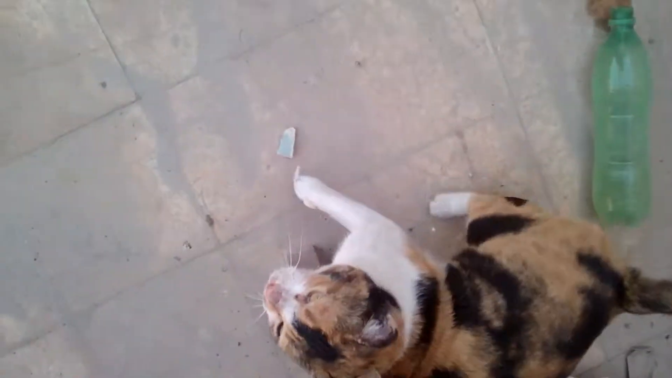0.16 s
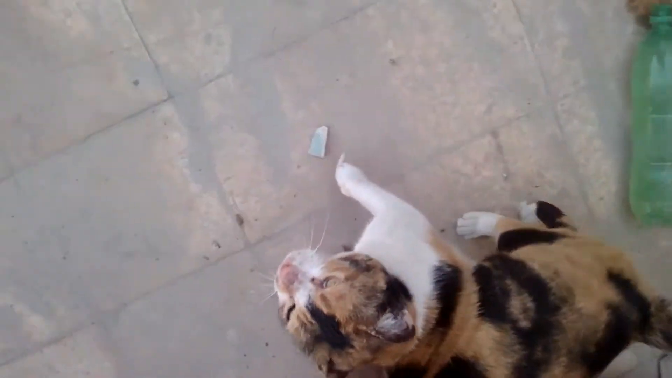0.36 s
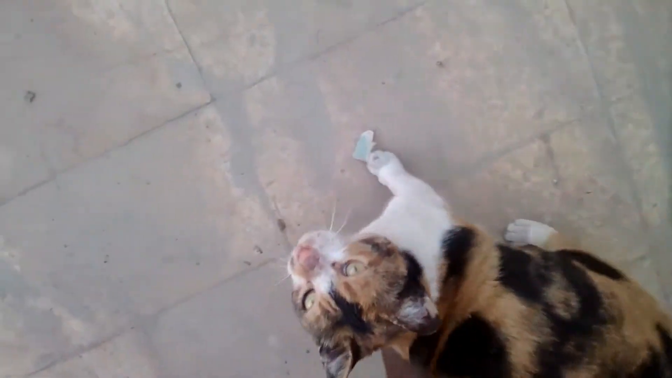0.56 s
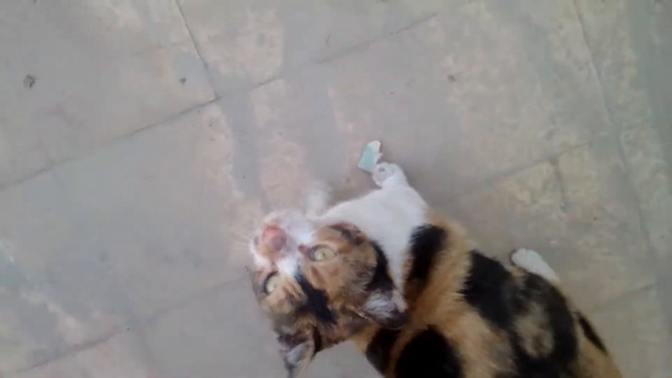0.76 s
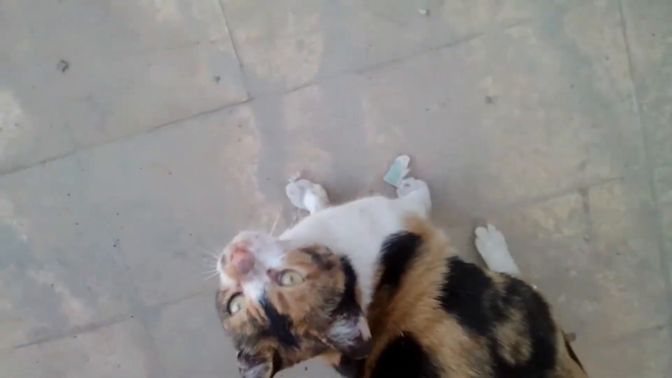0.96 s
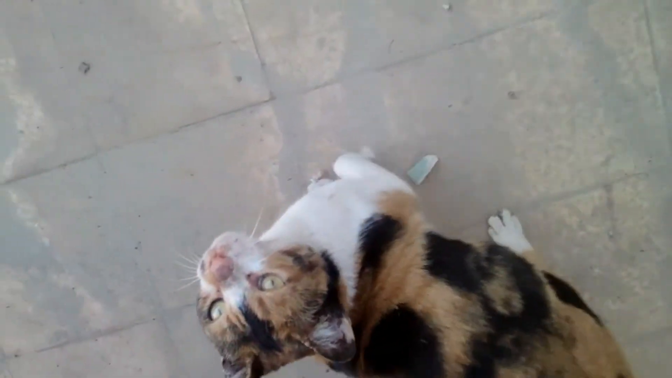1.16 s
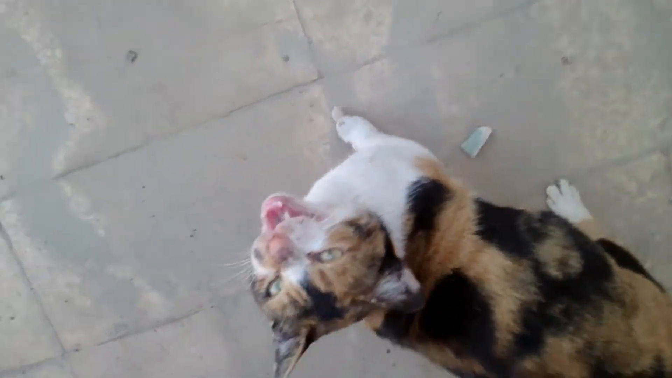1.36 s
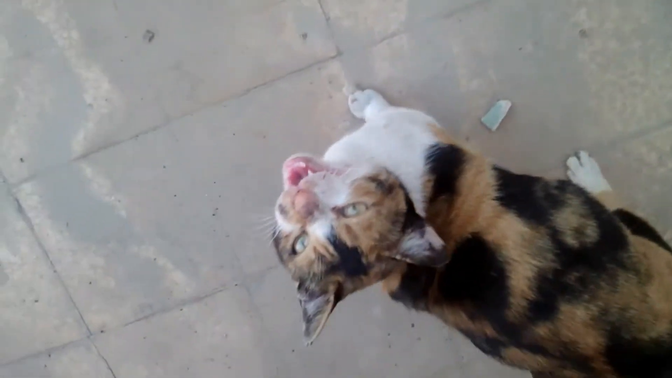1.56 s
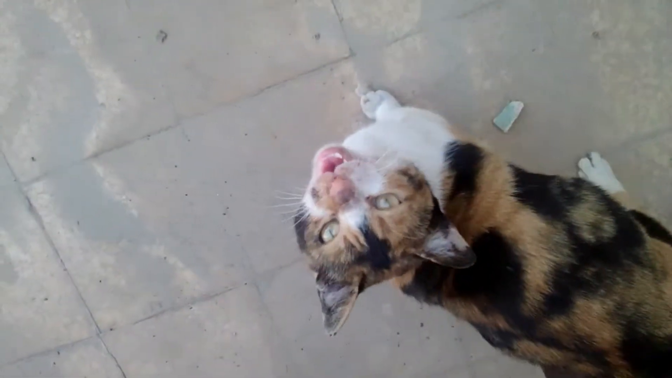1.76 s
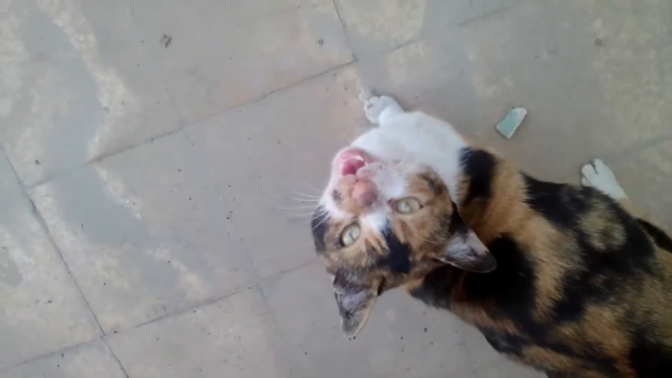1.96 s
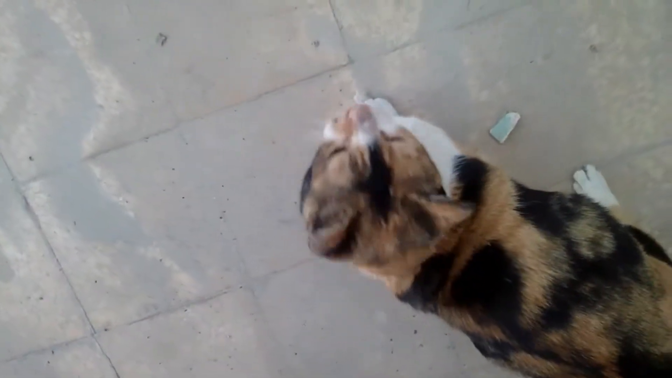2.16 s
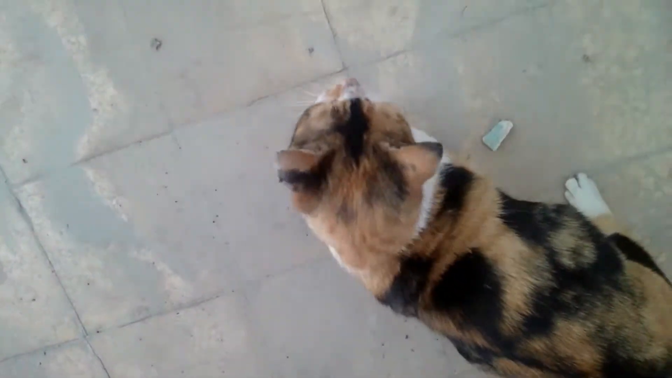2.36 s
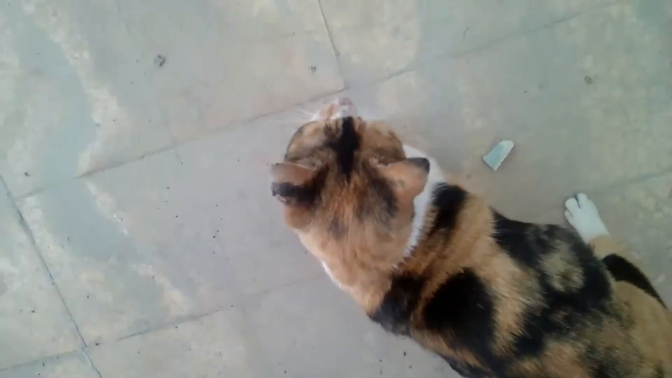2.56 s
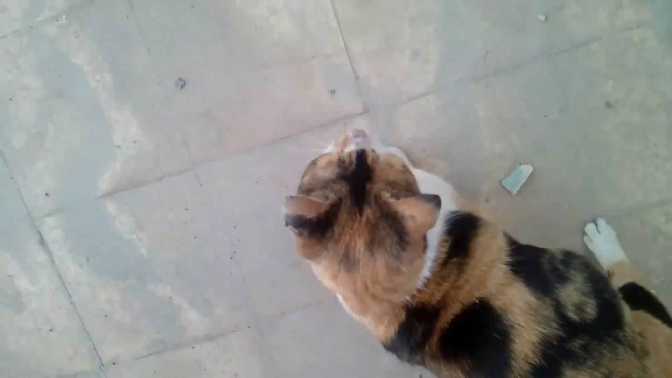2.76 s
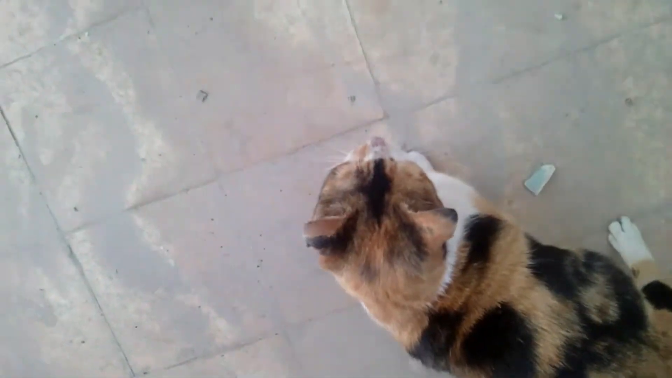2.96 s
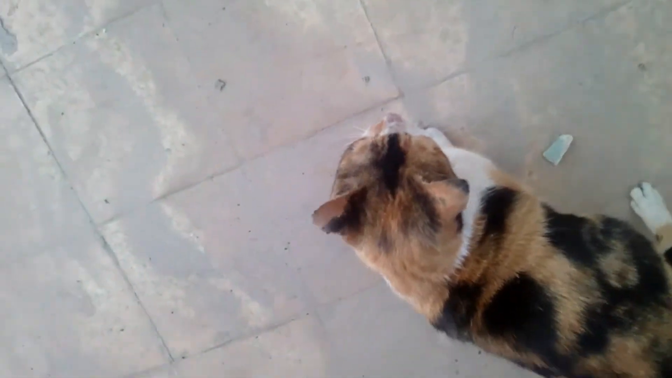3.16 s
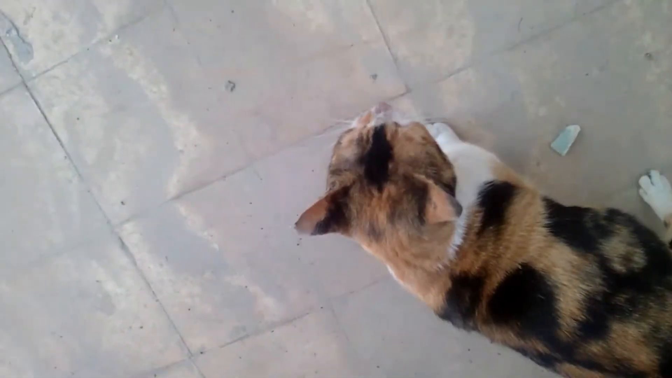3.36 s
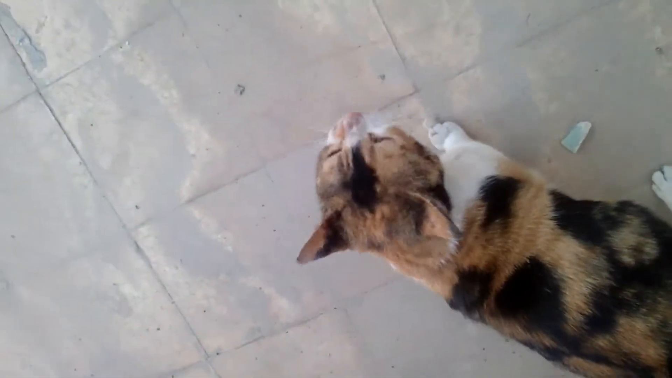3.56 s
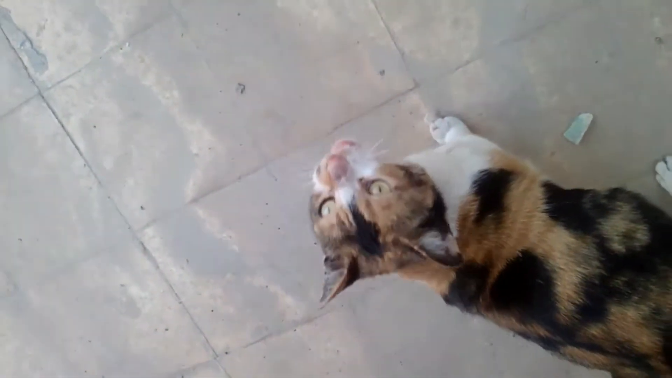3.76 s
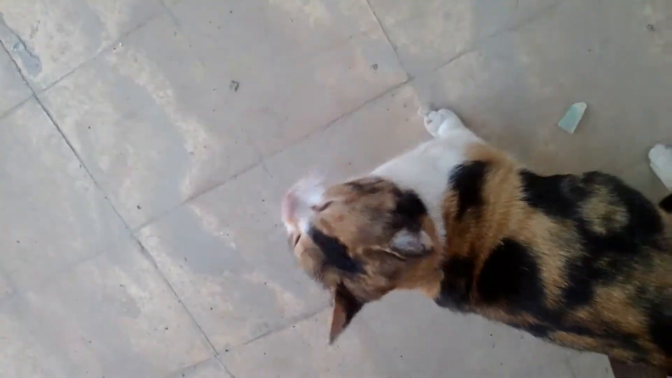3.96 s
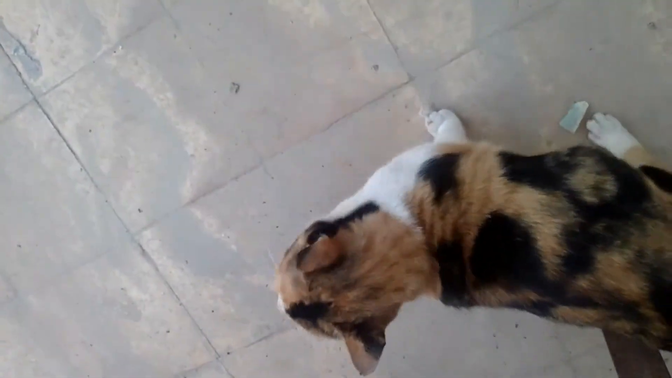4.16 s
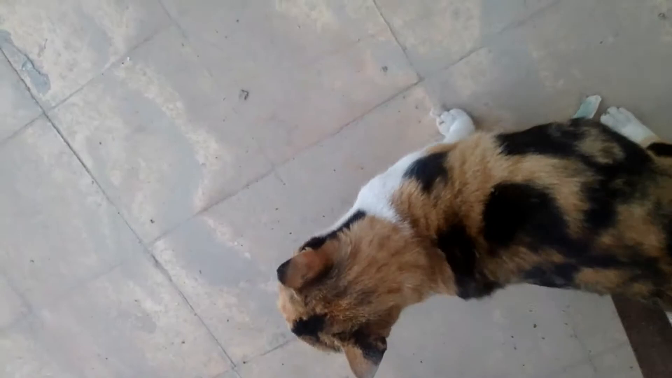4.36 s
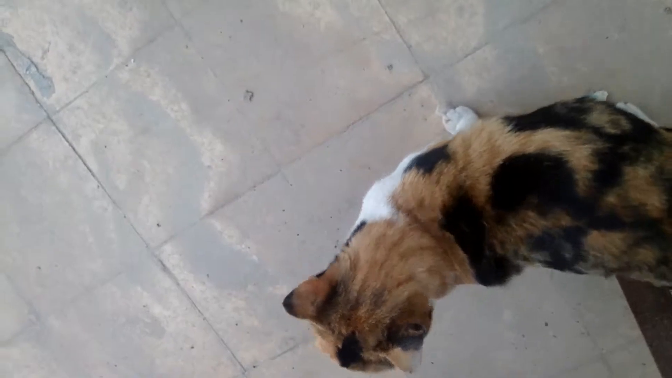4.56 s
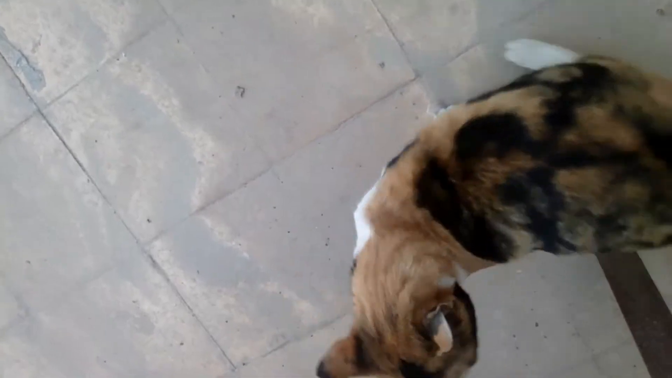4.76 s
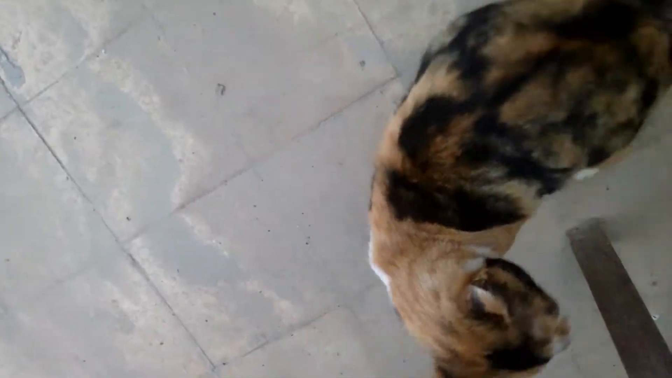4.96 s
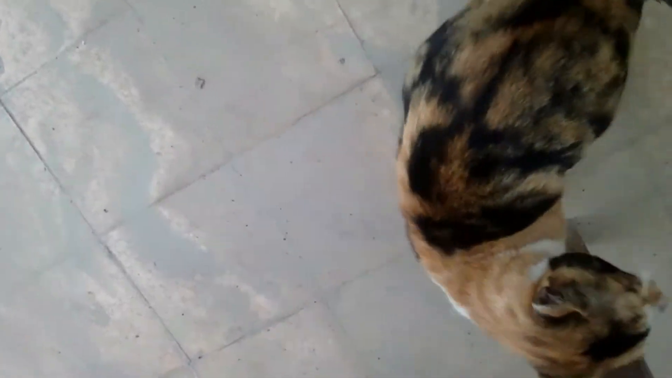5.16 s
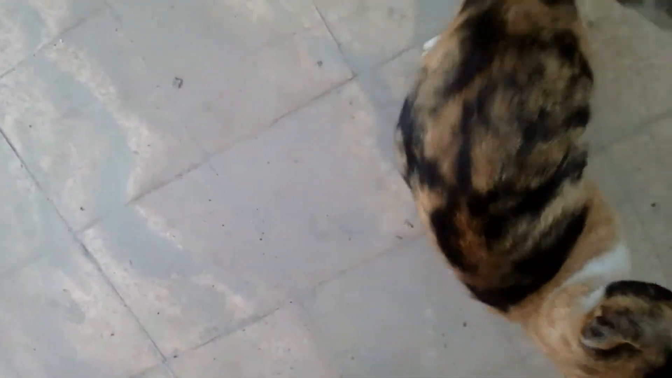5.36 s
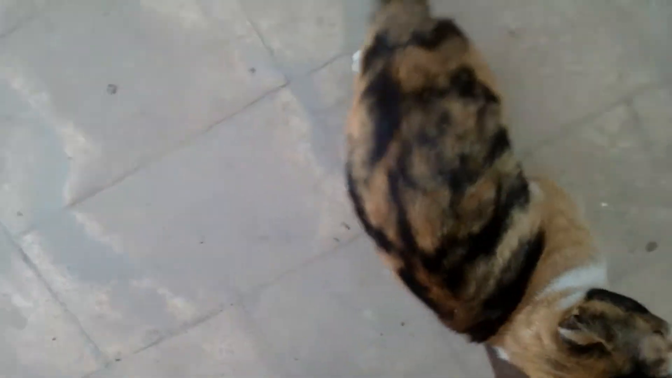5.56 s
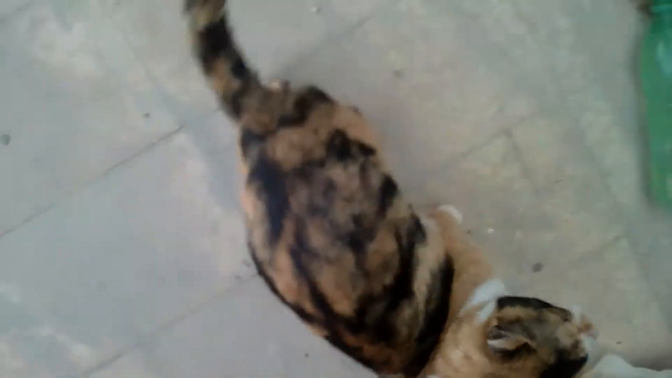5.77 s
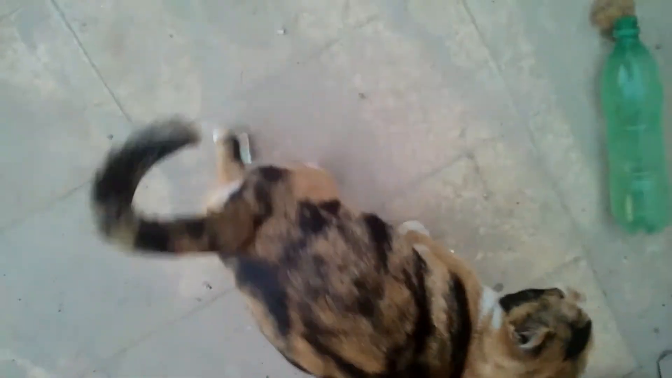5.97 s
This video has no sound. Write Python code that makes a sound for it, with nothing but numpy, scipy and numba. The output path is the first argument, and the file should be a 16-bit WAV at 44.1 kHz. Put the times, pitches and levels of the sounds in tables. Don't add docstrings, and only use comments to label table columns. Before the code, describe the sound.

A cat close to a phone microphone in a hard-floored space purrs twice very briefly, then gives a long, loud, nasal meow ending in a creak. Sharp lip smacks follow, then a shorter meow and finally a soft, brief one. Behind lie low town rumble, faint blurred birds and hiss, with momentary dropouts.

```python
import sys
import numpy as np
from scipy import signal
from scipy.io import wavfile
from scipy.ndimage import uniform_filter1d
from numba import njit

SR = 44100
rng = np.random.default_rng(int(sys.argv[2]) if len(sys.argv) > 2 else 0)


def level_to_linear(level):
    exponent = np.asarray(level, float) / 20
    return 10 ** exponent


def master(y):
    cut = np.clip(np.atleast_2d(y).T, -1, 1)
    pcm = np.round(cut * 32767)
    wavfile.write(sys.argv[1], SR, pcm.astype(np.int16))


N = 264600
T = np.arange(N) / SR

# start [s], creak start [s], end [s], creak effort [dB], mouth resonance in the creak [Hz].
CALLS = [
    (1.436, 2.368, 2.525, -41, 1850),
    (3.43, 4.098, 4.18, -42, 1550),
    (4.93, 5.338, 5.42, -50, 1420),
]
# time [s], pitch [Hz], effort [dB], jaw open [0-1], tongue forward [0-1], lips rounded [0-1].
SUNG_1 = [(1.457, 522.7, -41.5, 0.79, 0.99, 0), (1.487, 567.6, -33, .72, 0.7, 0.49),
          (1.535, 577.7, -32, 0.62, 0.74, 0.33), (1.575, 559.3, -37.5, 0.93, 0.79, .47),
          (1.671, 545.8, -33, 0.91, 0.54, 0.68), (1.921, 525.9, -37, 1, 0.57, 0.59),
          (2.171, 547, -35, 1, 0.03, 0.67), (2.25, 544.6, -35.5, 1, 0.55, 0.63),
          (2.309, 534, -45, 0.99, 0.73, 0.38)]
SUNG_2 = [(3.467, 488, -48.5, 0.79, 0.65, 0.72), (3.5, 542, -41.5, 0.75, 0.67, 0.52),
          (3.524, 516.6, -42.5, .78, .68, 0.53), (3.64, 558, -37, 0.73, 0.7, 0.64),
          (3.674, 569.6, -39, 0.48, 0.67, 0.54), (3.73, 563, -37.5, 0.09, .08, .74),
          (3.86, 549.2, -35, 0.86, 0.11, 0.63), (4.032, 529.7, -40.5, 1, 0.29, 0.68),
          (4.07, 512, -47.5, 1, 0.7, 0.54)]
SUNG_3 = [(4.97, 446, -59.5, 0.62, 0.37, 0.75), (5.02, 476.4, -47, 0.74, 0.68, 0.42),
          (5.05, 523, -46, 0.79, 0.93, 0.27), (5.08, 543.6, -48, 0.76, 0.86, 0.65),
          (5.115, 555, -46, 0.92, 0.92, 0.48), (5.171, 557, -42, 0.78, 0.38, 0.59),
          (5.225, 543.4, -48, 0.96, 0.76, 1.03), (5.279, 541.6, -44, 0.89, 0.26, 0.79),
          (5.319, 537, -52, 0.92, 0.79, 0.63)]
# from [s], to [s], fade [s], weakening of every second pulse [0-1],
# roughness [0-1].
DOUBLING = [
    (1.436, 1.445, .02, .15, .2),
    (1.478, 1.538, .025, .8, .035),
    (1.54, 1.555, .04, .3, .08),
    (2.275, 2.3, .02, .35, .06),
    (3.44, 3.6, .02, .6, .14),
    (3.605, 3.645, .08, .8, .06),
    (3.94, 4.09, .02, .06, .045),
    (4.93, 5.0, .03, .2, .2),
    (5.03, 5.22, .03, .04, .025),
]
# middle [s], half length [s], peak level [dB].
PURRS = [
    (1.03, 0.08, -52),
    (1.23, .11, -46),
]
# start [s], peak level [dB], colour [Hz], ring [s].
SMACKS = [(2.839, -34.5, 4530, 0.013), (2.843, -29.5, 5550, 0.017), (2.846, -39, 1300, 0.022),
          (2.85, -33.5, 4790, 0.1), (2.8567, -22, 4100, 0.0072), (2.865, -39.5, 5060, 0.03),
          (2.869, -35, 5030, 0.068), (3.1748, -28, 4940, 0.022), (3.1843, -36.5, 4960, 0.12),
          (3.2186, -38.5, 5200, 0.024), (3.229, -40.5, 4700, .02), (1.437, -40, 3800, .03),
          (3.44, -45, 1550, .02), (4.118, -37.5, 4797, 0.018), (4.123, -36, 3291, 0.045),
          (4.9158, -45, 4030, 0.0082), (5.749, -59, 845, .04)]
# centre [Hz], width [Hz], level [dB].
SMACK_MODES = [(1300, 300, 2), (2800, 130, -5), (4100, 670, -5), (5200, 1100, -14.5), (6400, 1200, -30),
               (8000, 5400, -15.5)]
# start [s], length [s], centre [Hz], spread [Hz], level [dB].
CHIRPS = [(3.662, 0.1, 8630, 900, -65.5), (0.761, 0.055, 5000, 900, -65.5), (0.869, 0.032, 5430, 700, -61),
          (.87, 0.023, 2730, 340, -64.5), (0.864, 0.021, 3800, 1620, -62), (1.34, 0.024, 5670, 370, -63),
          (4.196, 0.047, 5200, 970, -60.5), (4.284, 0.063, 4270, 973, -58.5),
          (5.468, 0.049, 2800, 111, -71), (5.607, 0.089, 2070, 200, -64), (5.689, 0.088, 2605, 216, -60.5),
          (5.766, 0.19, 2710, 216, -64), (5.798, 0.043, 4930, 750, -56), (5.886, 0.036, 5200, 833, -66),
          (5.924, 0.038, 3170, 324, -59), (5.925, 0.023, 4760, 1300, -54), (-.05, 0.14, 3080, 540, -62),
          (-.05, 0.19, 3850, 450, -66)]
# start [s], length [s], centre [Hz], spread [Hz], level [dB].
TWITTER = [
    (-.05, 0.11, 4640, 1296, -59),
    (0.101, 0.45, 4800, 1389, -71.5),
    (1.319, 0.12, 4600, 1500, -62.5),
    (2.644, 0.24, 4660, 1843, -64),
    (2.972, 0.34, 4240, 2040, -71),
    (4.407, 0.22, 4500, 826.8, -67.5),
]
# start [s], length [s], pitch [Hz], level [dB].
SQUEALS = [
    (.452, .15, 3660, -68.5),
    (.635, .165, 3655, -67.5),
    (.47, .335, 3321, -71.5),
]
# pitch [Hz], level [dB].
HUMS = [(1848, -80), (1583, -84.5), (11060, -89), (150.2, -76.5)]
# frequency [Hz], level [dB per Hz].
AIR_SPECTRUM = [(15, -53), (25, -35), (93, -3.5), (178, -6), (215, 0.5), (260, -2), (297, -10.5), (410, -7),
                (997, -9.5), (1200, -12.5), (1850, -13), (2490, -14.5), (3630, -13.5), (3930, -9.5),
                (15500, -31.5)]
# middle [s], half length [s], level over the rumble [dB].
SWELLS = [
    (2.1, 0.49, 2.5),
    (2.473, 0.14, 9.5),
    (3.05, .25, 5),
    (3.945, 0.35, 2.5),
    (4.732, .08, 0.5),
    (5.128, 0.15, 2.5),
    (5.338, 0.032, 5.5),
    (5.9, 0.055, 2),
]
# shut [s], reopen [s].
MUTES = [
    (.293, .356),
    (4.793, 4.856),
    (5.537, 5.6),
    (5.985, 6.1),
]


def meows():
    hz, effort_db, jaw, tongue, round_lips = gestures()
    on = sum((T > c[0]) * np.clip((c[2] - T) / .03, 0, 1) for c in CALLS) * 1.
    on = uniform_filter1d(on, int(0.0022 * SR))
    creaks = [ramp(c[1] - .01, .02) * (T < c[2]) for c in CALLS]
    creak = sum(creaks)
    narrow = sum((T > c[0] - .1) * (1 - ramp(c[0] + .2, .05)) for c in CALLS)

    throat_db = effort_db - 35.5 + 32.5 * jaw
    mouth_db = effort_db - 28 + 35.5 * round_lips
    palate_db = effort_db - 36.5 + 40.5 * tongue
    nose_db = effort_db - 5.5 * round_lips

    spells = np.array([ramp(a - .01, .012) * (1 - ramp(b, fade_s)) for a, b, fade_s, _, _ in DOUBLING])
    doubled, coarse = ((spells * np.array(DOUBLING)[:, [c]]).max(axis=0) for c in (3, 4))
    rough = .013 * level_to_linear(-38 - nose_db)
    rough = np.minimum(rough + (coarse + .28 * creak) * level_to_linear(3 * walk(60)), .55)
    weak = doubled + .55 * creak

    lift = np.maximum(narrow, np.clip((nose_db + 42.5) / 4.5, 0, 1))
    throat_hz = 1120 - 252 * np.sqrt(doubled) - 90 * creak
    mouth_hz = 1666 + sum(k * (c[4] - 1666) for k, c in zip(creaks, CALLS))
    palate_hz = 2175 - 150 * creak
    nose_hz = 3180 + 530 * lift
    high_nose_hz = (4780 - 330 * lift) * (1 + .025 * walk(14))
    patchy_db = 2.0 * np.array([walk(14), walk(14)])
    high_nose_db = -3 + 4 * narrow + patchy_db[0]
    top_db = -10 + narrow - 4 * creak + patchy_db[1]
    path_ms = 0.898 + 0.11 * walk(7)

    lip_lowpass = signal.butter(8, 7500, fs=SR, output="sos")
    pulses = signal.sosfiltfilt(lip_lowpass, folds(hz, rough, weak))

    def ring(centre_hz, width_hz):
        return band(band(pulses, centre_hz, width_hz), centre_hz, width_hz)

    nose = ring(nose_hz, 1600) + level_to_linear(high_nose_db) * ring(high_nose_hz, 830)
    nose = nose + level_to_linear(top_db) * (ring(5210, 1299) + level_to_linear(-2) * ring(7040, 1000))
    nose = signal.sosfiltfilt(signal.butter(5, 2600, "high", fs=SR, output="sos"), nose)
    bounce = .33 * np.interp(T - path_ms / 1000 - .00005 * walk(25), T, nose)
    flutter_db = (1.2 + 3 * np.minimum(rough, .3)) * walk(60)

    chest_db = -57 + 0.74 * (throat_db + 44.0) - 0.54 * (nose_db + 41.5)
    chest = level_to_linear(chest_db) * steady(ring(hz, 140))
    voice = level_to_linear(throat_db) * steady(ring(throat_hz, 520))
    voice = voice + level_to_linear(mouth_db) * steady(band(ring(mouth_hz, 400), mouth_hz, 510))
    voice = voice + level_to_linear(palate_db) * steady(ring(palate_hz, 280))
    voice = voice - level_to_linear(nose_db + flutter_db) * steady(nose + bounce)
    breath = level_to_linear(nose_db - 24) * band(rng.standard_normal(N), 6900, 8380)
    return on * (voice + chest + breath)


def gestures():
    creak_posture, shut_posture = (0.99, 0.43, 0.73), (.45, 0.31, 0.17)
    attack_db_per_s, attack_pitch, creak_pitch = 352.5, 0.94, .89
    rows = []
    for (start, creak, end, creak_db, _), sung in zip(CALLS, (SUNG_1, SUNG_2, SUNG_3)):
        first, last = sung[0], sung[-1]
        attack_db = first[2] - attack_db_per_s * (first[0] - start)
        low_hz = creak_pitch * last[1]
        rows.append((start, attack_pitch * first[1], attack_db, *first[3:]))
        rows += [*sung, (creak, *last[1:])]
        rows.append((creak + .025, low_hz, creak_db, *creak_posture))
        rows.append((creak + 0.37 * (end - creak), low_hz, creak_db - 4, *creak_posture))
        rows.append((end, low_hz, creak_db - 11, *shut_posture))
    rows = np.array(rows)
    return [np.interp(T, rows[:, 0], c) for c in rows[:, 1:].T]


def folds(hz, rough, weak):
    jitter = (.002 + .06 * np.minimum(rough, .15)) * walk(50)
    turns = np.cumsum(hz * (1 + jitter)) / SR
    count = np.arange(1, int(turns[-1]))
    s = np.interp(count, turns, T)
    rough, weak = np.interp(s, T, rough), np.interp(s, T, weak)
    odd = count % 2
    chance = rng.standard_normal((N // 50, 2))[count].T
    s = s + (.13 * rough * chance[0] + .05 * weak * odd) / np.interp(s, T, hz)
    size = level_to_linear(10 * rough * np.clip(chance[1], -2.5, 1.4)) * (1 - weak * odd)
    leak = np.interp(T, s, rough) * np.exp(-(turns % 1) / .9) * rng.standard_normal(N)
    return clicks(np.clip(s, .01, T[-1]), size) + .06 * leak


def purr():
    start_s, rate_hz = 1.01, 29.4
    s = start_s + np.arange(10) / rate_hz
    db = np.max([peak_db - 9 * ((s - mid) / half) ** 2 for mid, half, peak_db in PURRS], axis=0)
    db = db + 1.4 * rng.standard_normal(len(s))
    slaps = clicks(s, level_to_linear(db + 33.5))
    return band(band(slaps, 427, 330), 427, 330) + level_to_linear(-20.5) * band(slaps, 190, 90)


def smacks():
    out = np.zeros(N)
    t = np.arange(SR // 10) / SR
    for s, db, hz, ring_s in SMACKS:
        decay = np.exp(-t / 0.0015) + 0.51 * level_to_linear(-60 * t / max(ring_s, .002))
        snap = rng.standard_normal(len(t)) * decay
        body = sum((-1) ** k * level_to_linear(d) * band(snap, f, w) for k, (f, w, d) in enumerate(SMACK_MODES))
        body = body + level_to_linear(-.4 * (db + 31.0)) * band(band(snap, hz, hz / 3), hz, hz / 3)
        body = band(band(body, 3500, 9000), 3500, 9000)
        out[int(s * SR):][:len(t)] += level_to_linear(db) * body / np.abs(body).max()
    return out


def room(x, t60_s=0.66, wet_db=-24):
    t = np.arange(SR // 3) / SR
    tail = band(rng.standard_normal(len(t)), 2600, 2800) * level_to_linear(-60 * t / t60_s) * (t > .004)
    return x + level_to_linear(wet_db) * signal.fftconvolve(x, tail / np.sqrt(np.sum(tail ** 2)))[:N]


def far():
    out = sum(level_to_linear(db + 4.5) * np.sin(2 * np.pi * hz * T + 1.7 * walk(4.9)) for hz, db in HUMS)
    for s, length_s, hz, db in SQUEALS:
        shape = ramp(s, 0.01) * (1 - ramp(s + length_s - .02, 0.026))
        out += level_to_linear(db + 4) * shape * level_to_linear(3.7 * walk(28)) * np.sin(2 * np.pi * hz * T)
    for s, length_s, hz, spread_hz, db in CHIRPS + TWITTER:
        t = T[T < length_s + .25]
        noise = rng.standard_normal(SR)[:len(t) + SR // 10]
        tone = band(band(noise, hz, spread_hz), hz, spread_hz)[-len(t):]
        rise = np.clip(t / (.008 + .15 * length_s), 0, 1)
        shape = rise * np.exp(-np.clip(t - .8 * length_s, 0, None) / .022)
        piece = (level_to_linear(db) * shape * steady(tone, span_s=0.091))[max(int(-s * SR), 0):]
        place = out[max(int(s * SR), 0):][:len(piece)]
        place += piece[:len(place)]
    return out


def air():
    air_db, hiss_db, rumble_db = -60, -65.5, -66
    out = 0
    table_hz, table_db = np.transpose(AIR_SPECTRUM)
    swell_db = rumble_db + 68.5 + sum(db * np.exp(-((T - s) / half) ** 2) for s, half, db in SWELLS)
    for hz in 25 * 2 ** np.arange(0, 9.4, 1 / 3):
        noise = band(band(rng.standard_normal(N), hz, hz / 3), hz, hz / 3)
        low = 1 / (1 + (hz / 700) ** 2)
        flicker_db = (1.4 + 1.2 * low) * walk(9)
        level_db = np.interp(np.log(hz), np.log(table_hz), table_db)
        out = out + level_to_linear(level_db + low * swell_db + flicker_db) * noise
    hiss = level_to_linear(hiss_db) * band(rng.standard_normal(N), 14000, 16000)
    return out * level_to_linear(air_db) / out.std() + hiss


def ramp(start_s, length_s):
    return np.clip((T - start_s) / length_s, 0, 1)


def walk(rate_hz):
    k = int(SR / rate_hz)
    held = np.repeat(rng.standard_normal(N // k + 1), k)
    return 1.47 * uniform_filter1d(uniform_filter1d(held, k), k)[:N]


def clicks(s, size):
    at = np.asarray(s)[:, None] * SR
    taps = np.floor(at).astype(int) + np.arange(-7, 9)
    out = np.zeros(N + 16)
    window = np.cos((taps - at) * np.pi / 16) ** 2
    np.add.at(out, taps, np.asarray(size)[:, None] * np.sinc(taps - at) * window)
    return out[:N]


def steady(x, span_s=.025):
    k = int(span_s * SR)
    return x / np.sqrt(uniform_filter1d(uniform_filter1d(x ** 2, k), k) + 1e-20)


@njit
def svf(x, hz, width):
    y, b, l = np.empty(len(x)), 0., 0.
    for i in range(len(x)):
        g, k = np.tan(np.pi * hz[i] / SR), width / hz[i]
        v = (b + g * (x[i] - l)) / (1 + g * (g + k))
        b, l, y[i] = 2 * v - b, l + 2 * g * v, k * v
    return y


def band(x, hz, width_hz):
    return svf(x + 1e-18, np.clip(hz + np.zeros(len(x)), 10, .45 * SR), max(float(width_hz), 1.))


def duck(start_s, depth_db=-7, hold_s=0.053, back_s=0.046):
    down = np.clip((T - start_s) / .004, 0, 1)
    return level_to_linear(depth_db * down * np.clip(1 - (T - start_s - hold_s) / back_s, 0, 1))


def scene():
    return (room(meows() + purr() + smacks()) + far() + air())[None]


def top_cut(x):
    return signal.sosfilt(signal.butter(12, 15510, fs=SR, output="sos"), x)


def record(dry):
    gate = duck(2.872)
    for shut_s, reopen_s in MUTES:
        closing = np.exp(-np.clip(T - shut_s, 0, None) / .0015)
        opening = np.clip((T - reopen_s) / .115, 0, 1) ** 1.2 + .045 * (T > reopen_s)
        gate *= np.clip(closing + opening + level_to_linear(-36), 0, 1)
    return top_cut((gate * dry[0])[None])


dry = scene()
out = record(dry)
master(out)
```